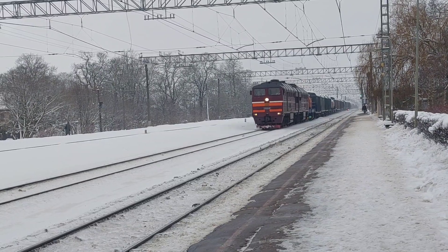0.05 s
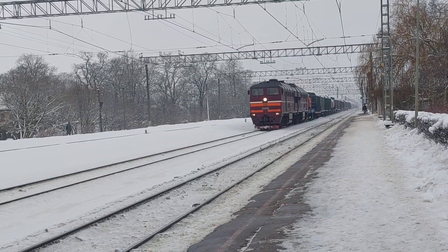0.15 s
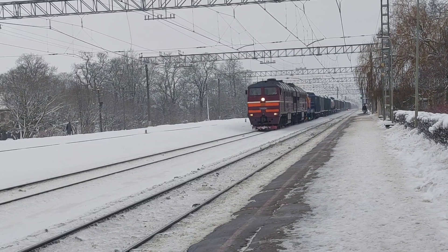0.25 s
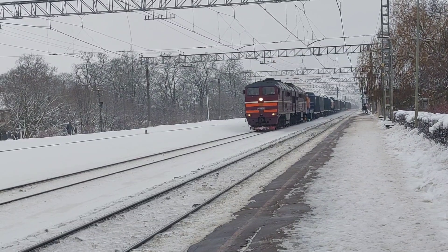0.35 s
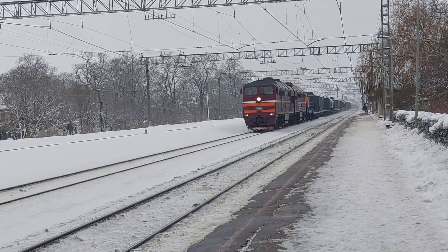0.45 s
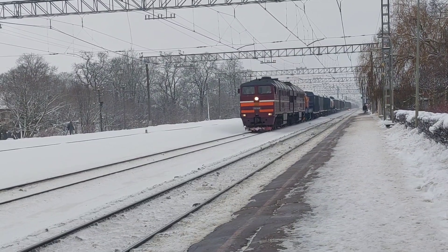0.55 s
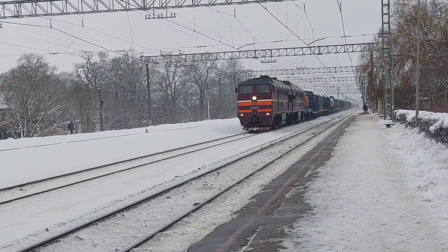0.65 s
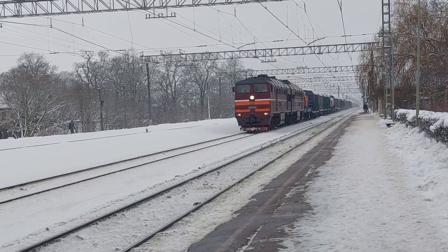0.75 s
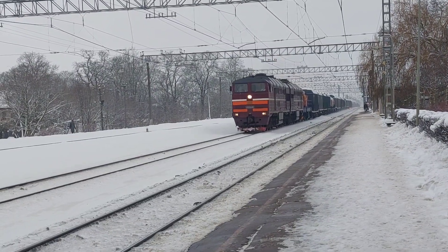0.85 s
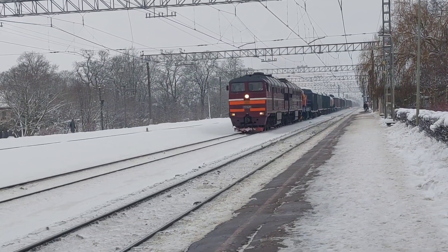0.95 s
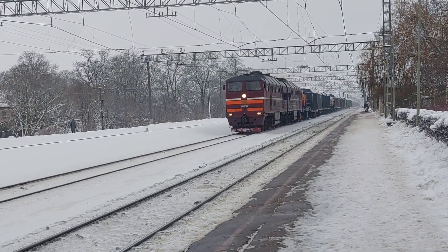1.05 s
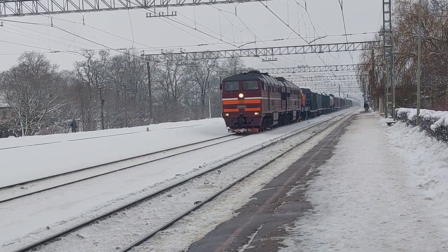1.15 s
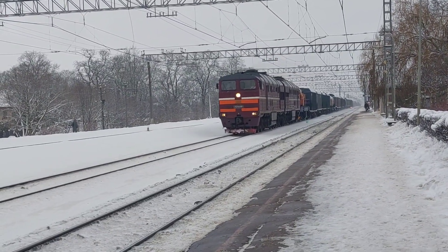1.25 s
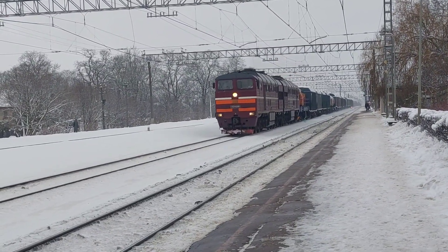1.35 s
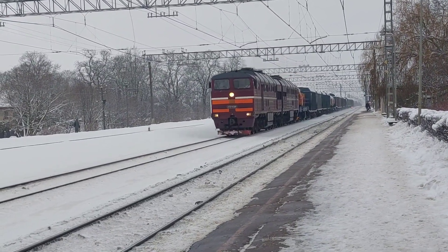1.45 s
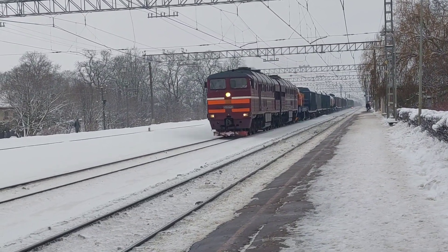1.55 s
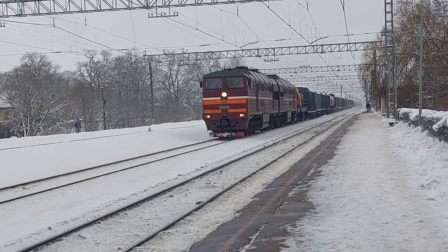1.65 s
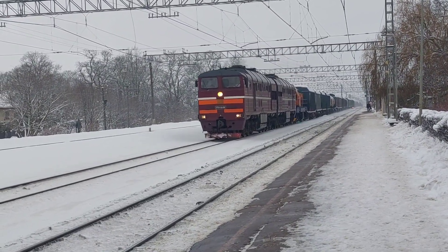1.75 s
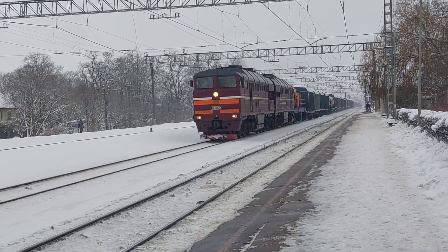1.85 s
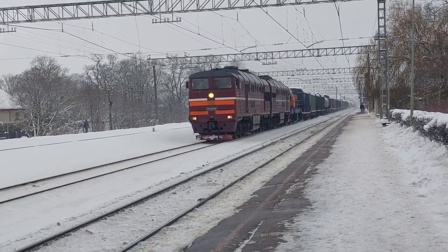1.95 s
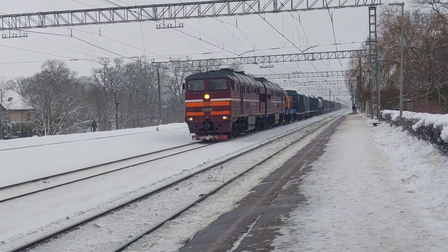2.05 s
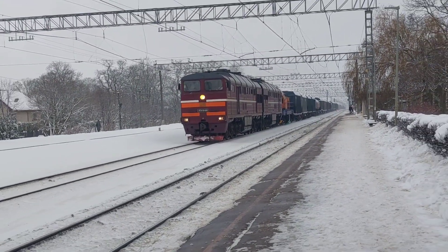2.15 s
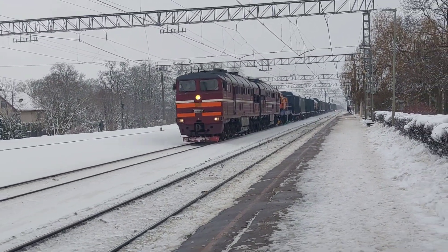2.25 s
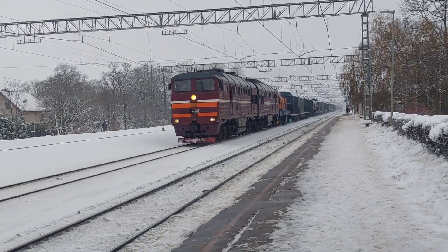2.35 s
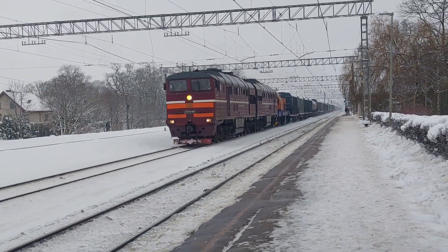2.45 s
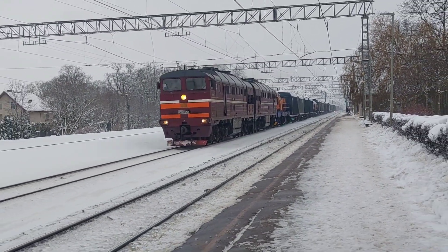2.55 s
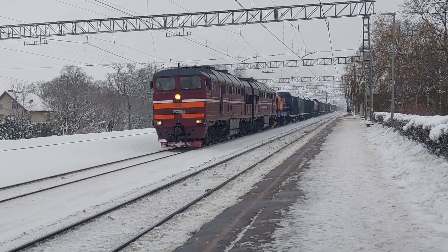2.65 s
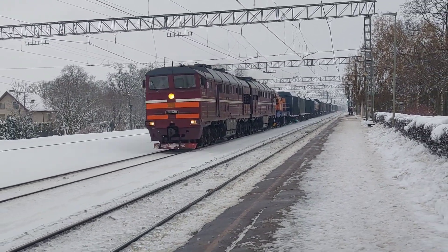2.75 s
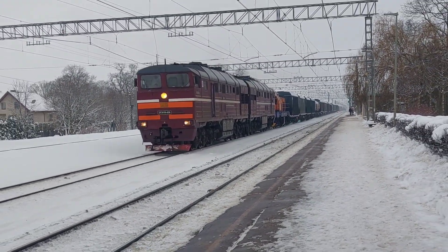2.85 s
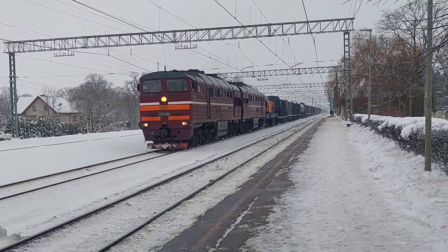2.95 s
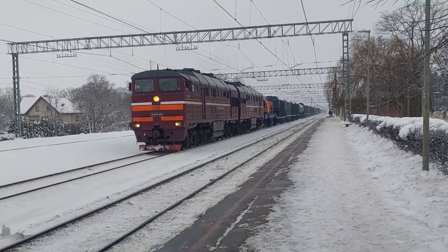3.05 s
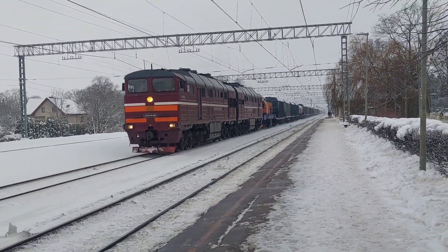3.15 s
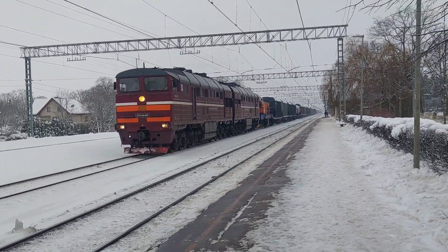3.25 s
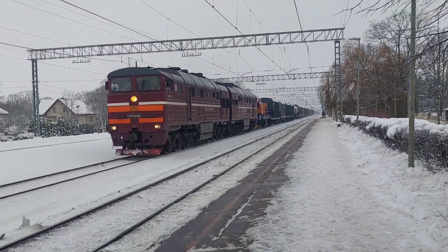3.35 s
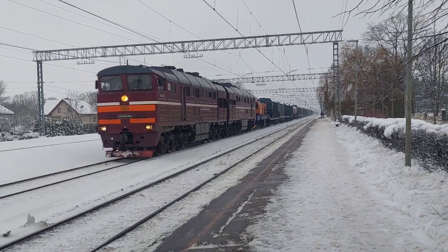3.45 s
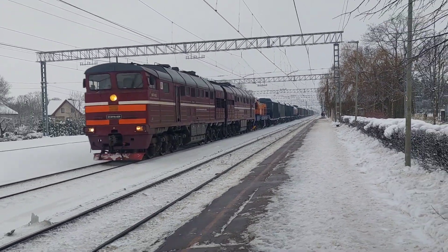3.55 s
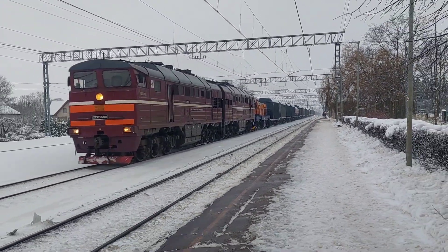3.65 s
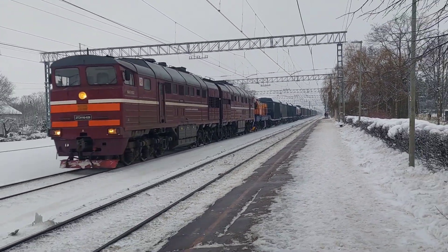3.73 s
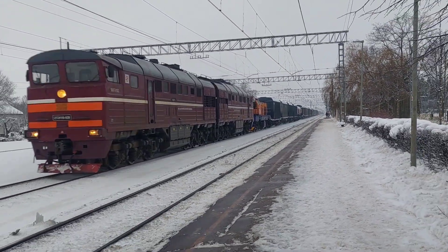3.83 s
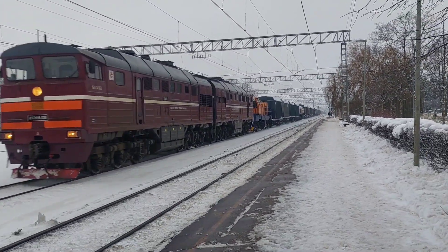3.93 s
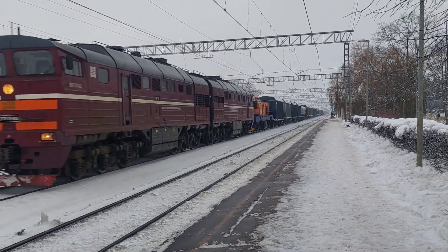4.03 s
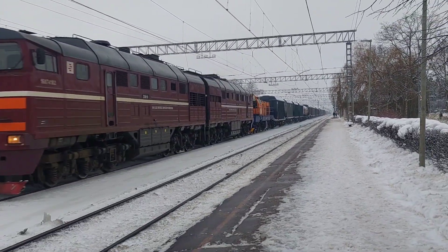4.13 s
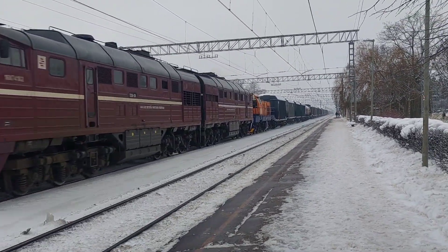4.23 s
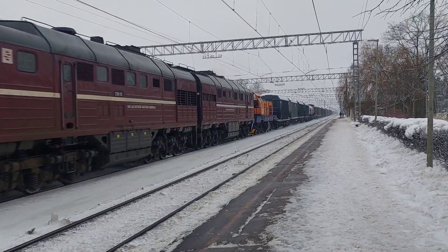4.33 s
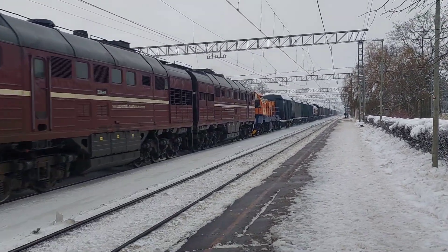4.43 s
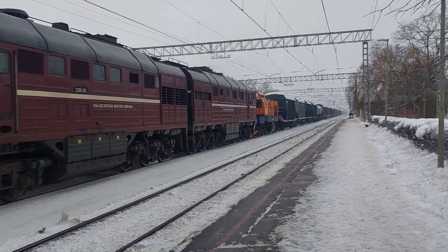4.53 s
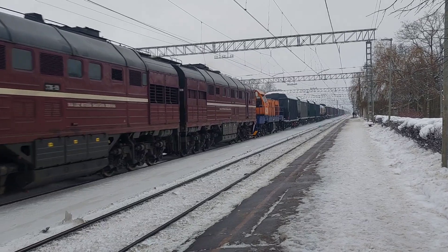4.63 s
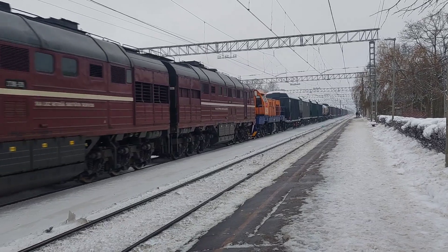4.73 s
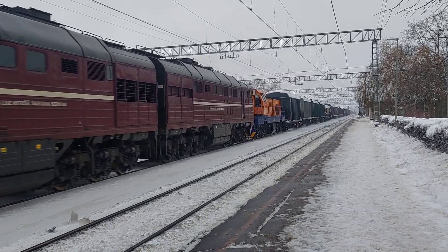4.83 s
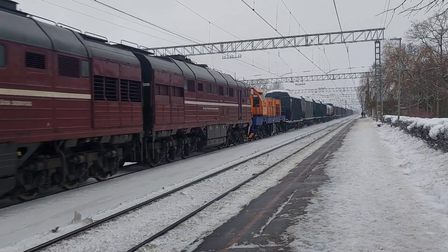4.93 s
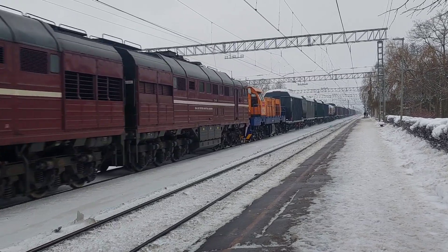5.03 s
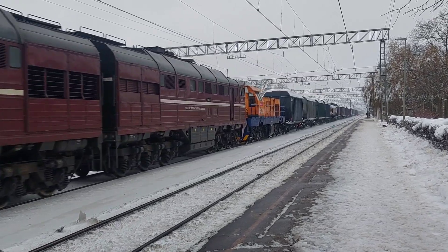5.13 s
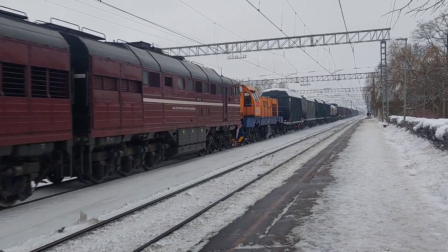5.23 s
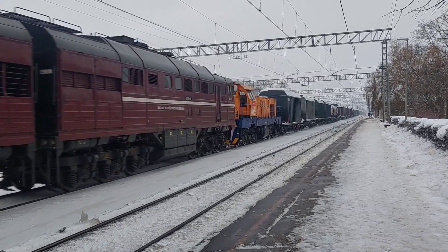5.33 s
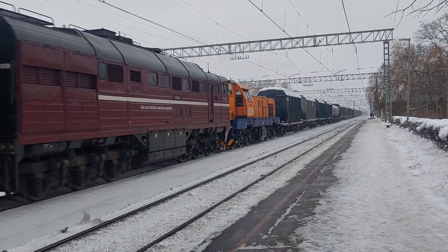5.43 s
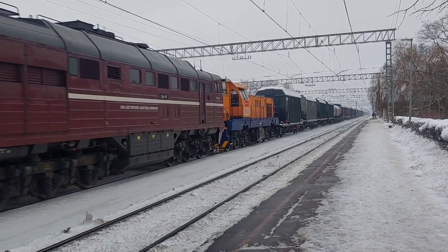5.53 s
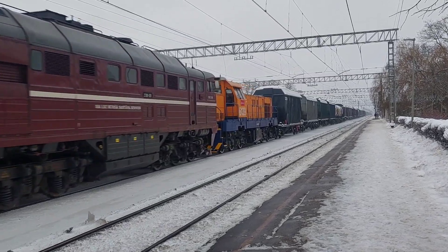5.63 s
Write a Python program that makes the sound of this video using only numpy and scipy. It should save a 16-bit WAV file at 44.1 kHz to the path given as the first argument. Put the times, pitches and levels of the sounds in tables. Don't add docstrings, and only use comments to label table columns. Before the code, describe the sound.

Outdoors on a snow-covered station platform, a twin-unit diesel locomotive approaches for about 5.7 seconds. At 0 s it is distant but already audible: a deep, uneven exhaust throb near 60 Hz pulsing about ten times a second, a fan hum, and a faint high turbocharger whistle around 3 kHz. From 2 to 4 s everything swells; gear and axle whines waver in and out, and wheel and rail rumble thickens beneath a rushing airy roar. Around 4 s the nose comes close, and short hissing jolts mark wheels over a rail joint at about 4.1, 4.25, 4.4 and 4.65 s, with fainter ones near 5, 5.4 and 5.6 s. The whines slide downward from about 4.5 s as the roar peaks. A sharp crack comes at 5.68 s, right at the end. The hand-held phone's covered left port is dull and weak; the right is full and bright.

```python
import sys
import numpy as np
from scipy import signal
from scipy.fft import rfft, irfft, next_fast_len
from scipy.io import wavfile
from scipy.ndimage import uniform_filter1d

SR = 44100
rng = np.random.default_rng(int(sys.argv[2]) if len(sys.argv) > 2 else 0)


def put_to_file(sound):
    columns = np.atleast_2d(sound).T
    safe = np.clip(columns, -1, 1)
    whole_steps = np.round(safe * 32767)
    wavfile.write(sys.argv[1], SR, whole_steps.astype(np.int16))


def invert_db(level):
    return 10 ** (np.asarray(level, dtype=float) / 20)


N = 250488
T = np.arange(N) / SR
SIZE = next_fast_len(N + SR // 10)
HZ = np.arange(SIZE // 2 + 1) * SR / SIZE + 1e-3

SPEED_M_S, TRACK_M, SOUND_M_S = 14, 8, 343
FIRST_THROB_S = .019
SHAFT_PER_BLADE = .186
TOP_HZ = 15780

# pitch on approach in Hz, time it draws level in seconds.
EXHAUST_AT, FAN_AT, GEAR_AT = (61.09, 5.28), (176.3, 5.82), (250, 5.4)
AXLE_AT, GEAR_REAR_AT = (371, 5.16), (964, 7)
TURBO_AT, TURBO_REAR_AT = (3178, 5.64), (3113, 7)

# level at 8 m in dB, loss over snow in dB/m.
EXHAUST_LINES = [
    (-15, 0.08),
    (-18.2, 0.1),
]
FAN_LINES = [
    (-9.0, 0.24),
    (-14.0, 0.13),
    (-38.5, 0.0),
]
GEAR_LINES = [
    (-22, 0.2),
    (-17.5, 0.4),
    (-16.5, 0.27),
]
AXLE_LINES = [
    (-16, 0.38),
    (-24, 0.2),
    (-30, .41),
]
TURBO_LINES = [
    (-28.5, .27),
    (-40.5, .35),
    (-31, .15),
    (-34.5, .4),
]
GEAR_REAR_LINES = [
    (-26.5, 0.3),
]
TURBO_REAR_LINES = [
    (-38, .05),
]

# order of the four-stroke cycle, level in dB under order 11.
WEAK_ORDERS_DB = [(7, -25), (8, -17.5), (9, -11.5), (10, -18), (12, -18), (14, -37), (15, -18.5), (19, -27),
                  (28, -17.5), (29, -14.5), (40, -18), (45, -19)]

# centre in
# seconds, width in seconds, change in dB.
EXHAUST_SWELLS = [
    [(.55, .25, -10), (1.55, .12, -3), (2.7, .15, 3), (3.55, .15, 3), (4.15, .2, -3.5), (4.97, .11, -9),
     (5.33, .07, 5), (5.59, .54, -14)],
    [(1.56, .12, 4), (2.58, .1, 0), (3.0, .12, 3), (4.97, .1, -6), (5.09, .39, -10), (5.63, .12, -18)],
]
FAN_SWELLS = [
    [(1.81, 0.066, 5), (2.95, 0.62, 7), (5.16, 0.42, -12.5), (5.61, 0.11, -20)],
    [(1.39, 0.51, -9.5), (4.12, 0.042, -10), (4.51, 0.075, -21), (4.84, 0.1, -9.5), (5.47, 0.18, -10.5)],
    [(4.24, 0.75, 17.5), (4.43, 0.086, -21), (4.92, 0.14, -18)],
]
GEAR_SWELLS = [
    [(4.26, 0.049, 9.5), (4.7, 0.13, -14), (4.95, 0.075, 7), (5.68, 0.09, -12)],
    [(2.97, 0.061, -14), (3.85, 0.08, -8), (5.32, 0.47, -16.5)],
    [(1.42, .06, -13), (2.79, .07, -5.5), (3.4, .09, -5), (3.1, .1, 3), (3.95, .12, 3), (5.2, .06, -4),
     (4.28, .14, -12), (4.65, .06, 5), (4.85, .04, -6), (5.4, .08, -14), (5.55, .05, 2), (5.68, .05, -9.5)],
]
AXLE_SWELLS = [
    [(2.48, 0.17, -13), (3.11, 0.13, -8), (4.59, 0.15, -12), (5.12, 0.055, -13), (5.44, 0.05, -13.5)],
    [(3.65, .05, 5), (4.07, .03, 10), (4.45, .07, 11.5), (4.6, .04, -8), (4.67, .03, 6), (4.93, .04, 4),
     (5.41, .09, -14), (5.64, .05, 4.5)],
    [(3.2, .15, 5), (3.95, .15, 4), (4.55, .08, -8), (5.23, .18, -8)],
]
TURBO_SWELLS = [
    [(2.17, .08, 9.5), (2.75, .06, 12.5), (3.11, 0.12, 10.5), (3.49, .05, 9), (3.85, .04, -8),
     (4.1, .07, 11), (4.49, .04, 10), (4.63, .03, -9), (4.72, .03, 7), (4.88, .05, 4), (5.05, .03, -10),
     (5.26, 0.04, 6.5), (5.33, .012, -10), (5.41, .06, 11), (5.55, .05, 6)],
    [(3.65, .12, 9), (4.05, 0.087, 8), (4.45, .2, 9), (5.0, .07, -3), (5.6, .06, 3)],
    [(3.97, .05, -10), (4.26, .05, -13), (4.48, .07, 8), (4.8, .08, 9), (5.21, .15, -17), (5.49, .045, 12)],
    [(4.0, .07, 6), (4.44, .04, 5), (4.62, .08, -9), (4.92, .07, 5), (5.12, .06, -9), (5.5, .05, 8),
     (5.65, 0.046, -11)],
]
GEAR_REAR_SWELLS = [
    [(2.51, .07, -10), (5.3, 0.65, -18)],
]
TURBO_REAR_SWELLS = [
    [(1.76, .2, 11), (5.2, .6, -31)],
]

# frequency in Hz, density in dB per Hz.
RUMBLE_COLOUR = [(15, -29), (25, -8.5), (60, 2.5), (81, 0), (113, 0), (181, -6.5), (243, -5), (354, -9.5),
                 (461, -18), (579, -19), (728, -14), (886, -13), (978, -9), (1060, -24), (1250, -44),
                 (1620, -50), (2750, -120)]
# level when level in dB, loss over snow in dB/m,
# time it draws level in seconds, nearest distance in m.
RUMBLE_ORIGINS = [
    (-29, 0.11, 4.75, 14.2),
    (-24, .125, 5.4, 14.8),
    (-26.5, 0.15, 5.11, 12.2),
    (-28, 0.07, 4.82, 10.4),
]
# frequency in Hz, density in dB per Hz.
ROAR_COLOUR = [(650, -21), (1100, 2.5), (1190, -1), (1700, 5.5), (2400, -3.5), (2590, -1.5), (2930, -6.5),
               (3160, -3.5), (3310, -13), (3780, -5.5), (5640, -15.5), (6380, -15), (8150, -41),
               (12400, -30), (15700, -29.5)]
# level when level in dB, loss over snow in dB/m,
# time it draws level in seconds, nearest distance in m.
ROAR_ORIGINS = [
    (-24, 0.071, 5.5, 8.9),
    (-33.5, .11, 5.6, 7),
    (-38.5, .21, 5.75, 10),
    (-49, 0.32, 5.47, 9.1),
]

# centre in seconds, width in seconds,
# lift in dB.
JOLTS = [
    (4.09, 0.048, 3),
    (4.25, 0.033, 2.5),
    (4.41, 0.045, 3.5),
    (4.65, 0.046, 1.5),
    (4.95, 0.03, 0.5),
    (5.42, .03, 1.5),
    (5.6, .04, 1.5),
    (5.68, .003, 12),
]
# centre in seconds, width in seconds, lift in dB.
NOSE = [
    (4.05, .2, 1.6),
]

# frequency in Hz, left minus right in dB.
GLOVE_DB = [(60, -3), (110, -2.5), (200, -5.5), (380, -6.5), (700, -9), (1290, -13), (2500, -25),
            (3100, -19), (3500, -31), (5000, -33), (7000, -40), (10500, -42), (13000, -23), (16000, -22)]
# frequency in Hz, share from 0 to 1.
LIKENESS = [(60, 1), (130, 0.9), (290, 0.9), (450, 0.88), (640, 0.8), (1000, 0.26), (1410, 0.67), (3100, 0),
            (6820, 0.13)]
# time in seconds, lag in samples.
LEFT_LAG = [(0, 7), (3.5, 6), (4.5, 3), (5.3, -4), (5.68, -6)]
# frequency in Hz, lag in samples.
GLOVE_LAG = [(86, 18), (172, 13), (258, 4), (345, -1), (470, -2), (600, 3), (800, 1), (1000, -2)]

# frequency in Hz, density in dB per Hz.
HISS_LEFT = [(2500, -30), (3500, -7), (7700, -9), (8100, -5), (10000, -4), (10300, -9), (13000, -5),
             (16000, 0)]
HISS_RIGHT = [(6000, -35), (8000, -19), (10000, -18), (10300, -21), (12800, -17), (13200, -7), (15000, 0),
              (16000, 0)]
HISS_DB = [-75, -60]


def columns(table):
    s, *rest = np.transpose(table)
    return [np.interp(T, s, c) for c in rest]


def over_hz(points):
    hz, value = np.transpose(points)
    return np.interp(np.log(HZ), np.log(hz), value)


def walk(rate_hz):
    hold = int(SR / rate_hz)
    at = np.arange(0, N, 50)
    held = rng.standard_normal(N // hold + 1)[at // hold]
    slewed = uniform_filter1d(uniform_filter1d(held, hold // 50), hold // 50)
    return 1.3 * np.interp(np.arange(N), at, slewed)


def doppler(hz, level_s):
    ahead_m = (level_s - T) * SPEED_M_S
    mach = SPEED_M_S / SOUND_M_S
    return hz * (1 + mach * ahead_m / np.hypot(ahead_m, TRACK_M)) / (1 + mach)


def nearing(db, loss_db_m, level_s, nearest_m):
    metres = np.hypot((level_s - T) * SPEED_M_S, nearest_m)
    return db - 20 * np.log10(metres / nearest_m) - loss_db_m * (metres - nearest_m)


def swells(rows):
    t = T[::50]
    bells = [db * np.exp(-.5 * ((t - s) / max(width_s, 1e-3)) ** 2) for s, width_s, db in rows]
    return np.interp(T, t, sum(bells))


def levels(machine, lines, line_swells):
    level_s = machine[1]
    return [nearing(*line, level_s, TRACK_M) + swells(rows) for line, rows in zip(lines, line_swells)]


def tone(hz, multiples, levels_db, rough_rad, flicker_db, rate_hz, start_s=0):
    phase = 2 * np.pi * (np.cumsum(hz) / SR - hz[0] * start_s)
    out = 0
    for k, db in zip(multiples, levels_db):
        level = np.sqrt(2) * invert_db(db + flicker_db * walk(rate_hz))
        out = out + level * np.sin(k * phase + rough_rad * walk(rate_hz))
    return out


def exhaust():
    cycle_hz = doppler(*EXHAUST_AT) / 11
    main_db, second_db = levels(EXHAUST_AT, EXHAUST_LINES, EXHAUST_SWELLS)
    order, weak_db = np.transpose(WEAK_ORDERS_DB)
    throb = tone(cycle_hz, (11, 13), (main_db, second_db), .15, .8, rate_hz=4, start_s=FIRST_THROB_S)
    weak = tone(cycle_hz, np.round(order), main_db + weak_db[:, None], 1.2, 3, rate_hz=3)
    return throb + weak


def cooling_fan():
    return tone(doppler(*FAN_AT), (1, 2, 3), levels(FAN_AT, FAN_LINES, FAN_SWELLS), .2, .7, rate_hz=6)


def generator_gear():
    return tone(doppler(*GEAR_AT), (1, 3, 4), levels(GEAR_AT, GEAR_LINES, GEAR_SWELLS), .25, .7, rate_hz=12)


def axle_drive():
    return tone(doppler(*AXLE_AT), (1, 2, 3), levels(AXLE_AT, AXLE_LINES, AXLE_SWELLS), .7, 1, rate_hz=14)


def turbocharger():
    first_db, second_db, under_db, over_db = levels(TURBO_AT, TURBO_LINES, TURBO_SWELLS)
    lines_db = (first_db, second_db, under_db, over_db, second_db - 13, over_db - 19)
    shaft = SHAFT_PER_BLADE
    multiples = (1, 2, 1 - shaft, 1 + shaft, 2 - shaft, 2 + shaft)
    return tone(doppler(*TURBO_AT), multiples, lines_db, .3, 2, rate_hz=30)


def second_unit():
    gear_db = levels(GEAR_REAR_AT, GEAR_REAR_LINES, GEAR_REAR_SWELLS)
    turbo_db = levels(TURBO_REAR_AT, TURBO_REAR_LINES, TURBO_REAR_SWELLS)
    gear = tone(doppler(*GEAR_REAR_AT), (1,), gear_db, 1.5, 3.5, rate_hz=18)
    turbo = tone(doppler(*TURBO_REAR_AT), (1,), turbo_db, 1.2, 3, rate_hz=25)
    return gear + turbo


def broadband(colour, origins, edges_hz, flicker_db, rate_hz):
    inside = (HZ > colour[0][0]) & (HZ < colour[-1][0])
    spectrum = rfft(rng.standard_normal((2, SIZE))) * invert_db(over_hz(colour)) * inside
    power = np.abs(spectrum[0]) ** 2
    centres = np.log([np.sqrt(lo * hi) for lo, hi in edges_hz])
    place = np.interp(np.log(HZ), centres, np.arange(len(centres)))
    shared = walk(rate_hz / 3)
    out = 0
    for k, (origin, (lo, hi)) in enumerate(zip(origins, edges_hz)):
        rms = np.sqrt(2 * power[(HZ > lo) & (HZ < hi)].sum()) / SIZE
        share = np.cos(np.pi / 2 * np.clip(place - k, -1, 1))
        band = irfft(spectrum * share, SIZE)[:, :N] / rms
        out = out + band * invert_db(nearing(*origin) + flicker_db * (walk(rate_hz) + shared))
    return out


def fading(x, depth_db, hz, seconds):
    _, _, z = signal.stft(x, nperseg=512)
    field = rng.standard_normal(z.shape)
    field = uniform_filter1d(field, max(int(hz * 512 / SR), 1), axis=1)
    field = uniform_filter1d(field, max(int(seconds * SR / 256), 1), axis=2)
    return signal.istft(z * invert_db(depth_db * field / field.std()), nperseg=512)[1][:, :N]


def rolling_rumble():
    edges_hz = [(80, 150), (190, 332), (390, 660), (760, 977)]
    return broadband(RUMBLE_COLOUR, RUMBLE_ORIGINS, edges_hz, flicker_db=.4, rate_hz=6)


def air_roar():
    edges_hz = [(1200, 3400), (3300, 4630), (4600, 7100), (9000, 16350)]
    roar = broadband(ROAR_COLOUR, ROAR_ORIGINS, edges_hz, flicker_db=.5, rate_hz=9)
    return fading(roar * invert_db(swells(JOLTS)), depth_db=1.2, hz=200, seconds=.04)


def ports(tones, noise):
    dull = invert_db(over_hz(GLOVE_DB))
    like = np.clip(over_hz(LIKENESS), 0, 1)
    direct, scattered = irfft(rfft(noise, SIZE) * 2 / (1 + dull), SIZE)[:, :N]
    late = np.arange(N) - columns(LEFT_LAG)[0]

    def delayed(x):
        return rfft(np.interp(late, np.arange(N), x), SIZE)

    left = delayed(tones) + like * delayed(direct) + np.sqrt(1 - like ** 2) * rfft(scattered, SIZE)
    left *= dull * np.exp(-2j * np.pi * HZ * over_hz(GLOVE_LAG) / SR)
    return np.array([irfft(left, SIZE)[:N], tones + direct])


def scene():
    tones = exhaust() + cooling_fan() + generator_gear() + axle_drive() + turbocharger() + second_unit()
    noise = invert_db(swells(NOSE)) * (rolling_rumble() + air_roar())
    return ports(tones, noise)


def roll_off(x):
    return signal.sosfilt(signal.butter(12, 15790, fs=SR, output="sos"), x)


def record(dry):
    colour = invert_db(np.array([over_hz(HISS_LEFT), over_hz(HISS_RIGHT)]))
    hiss = irfft(rfft(rng.standard_normal((2, SIZE))) * colour, SIZE)[:, :N]
    wet = dry + hiss / hiss.std(axis=1, keepdims=True) * invert_db(np.array(HISS_DB))[:, None]
    wet = signal.sosfilt(signal.butter(3, 32, "high", fs=SR, output="sos"), wet)
    wet = signal.sosfilt(signal.ellip(10, .2, 80, TOP_HZ, fs=SR, output="sos"), wet)
    return roll_off(np.clip(wet, -1.05, 1.05))


dry = scene()
out = record(dry)
put_to_file(out)
```